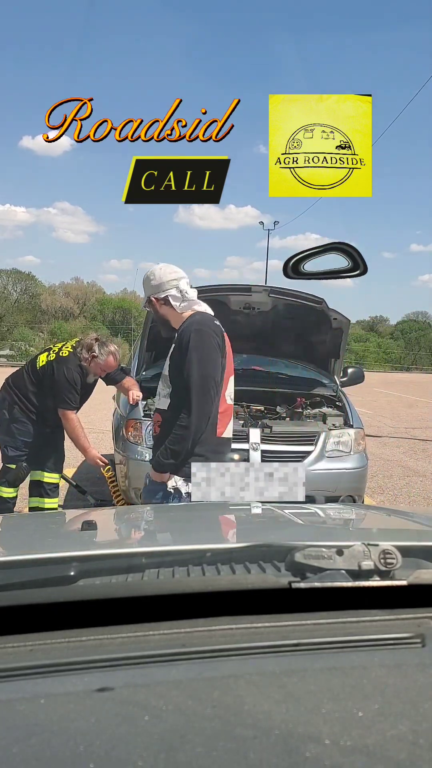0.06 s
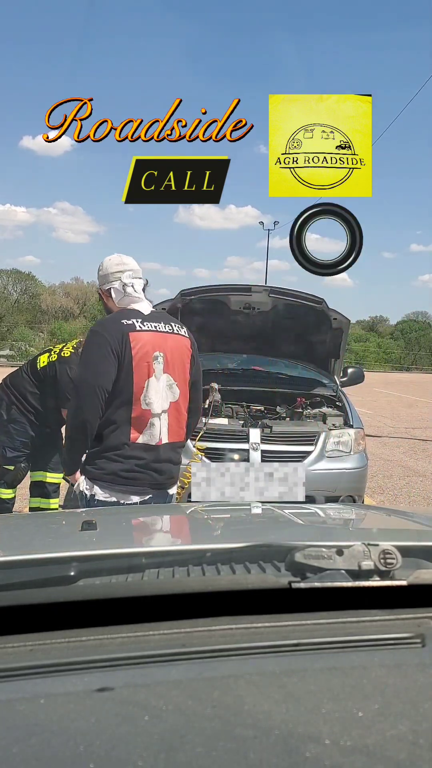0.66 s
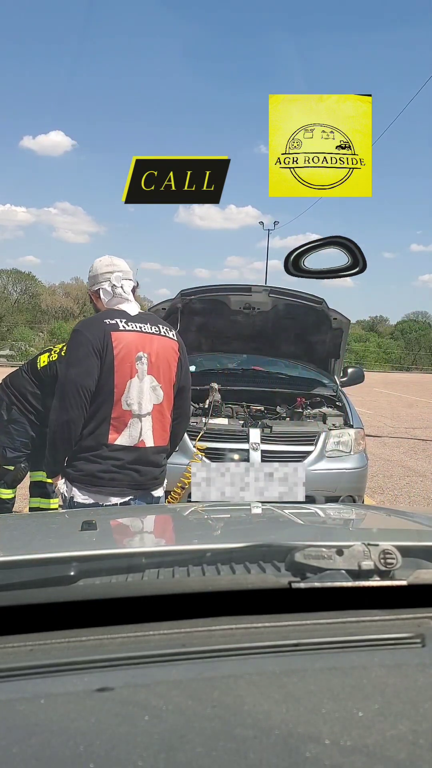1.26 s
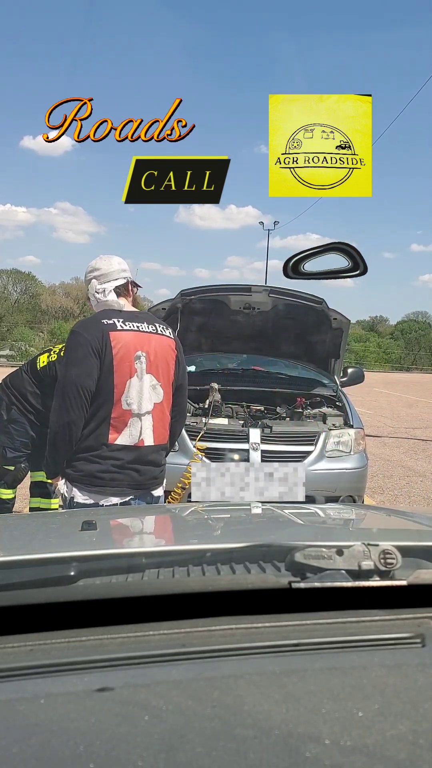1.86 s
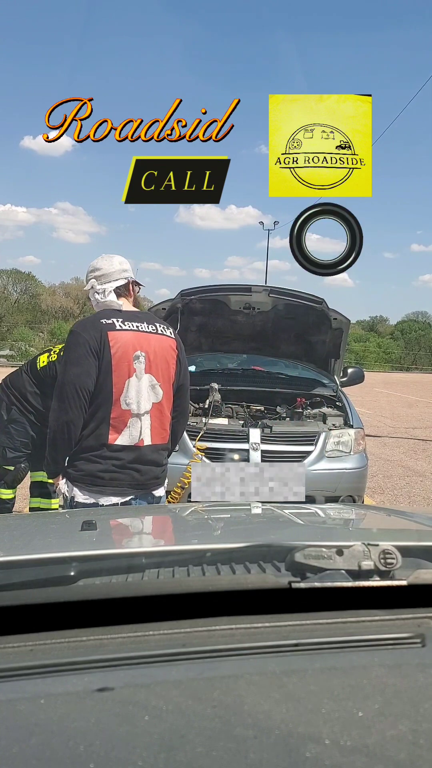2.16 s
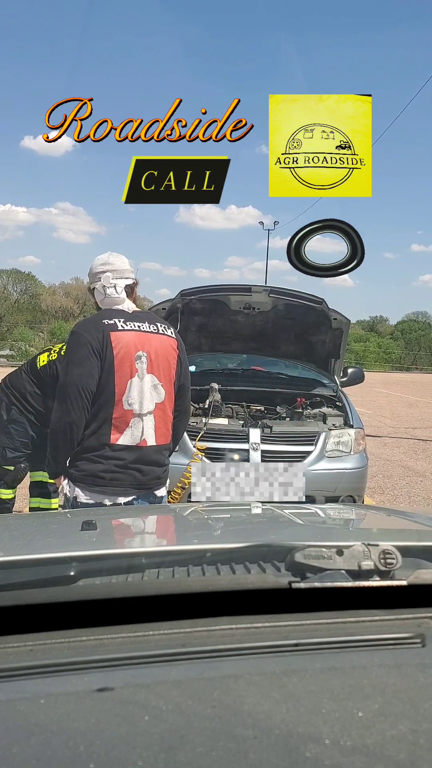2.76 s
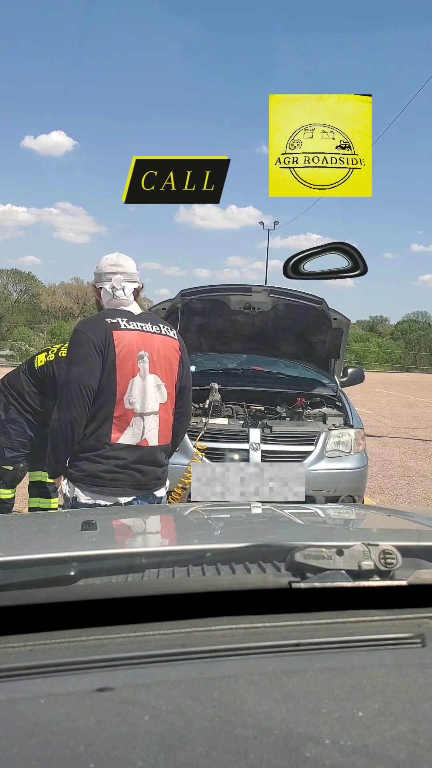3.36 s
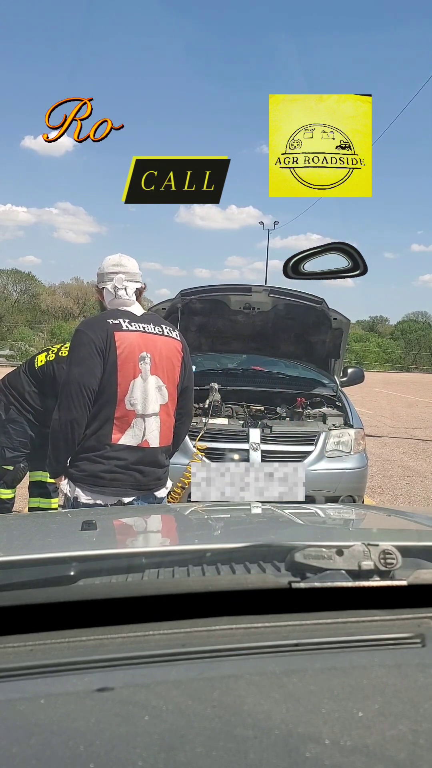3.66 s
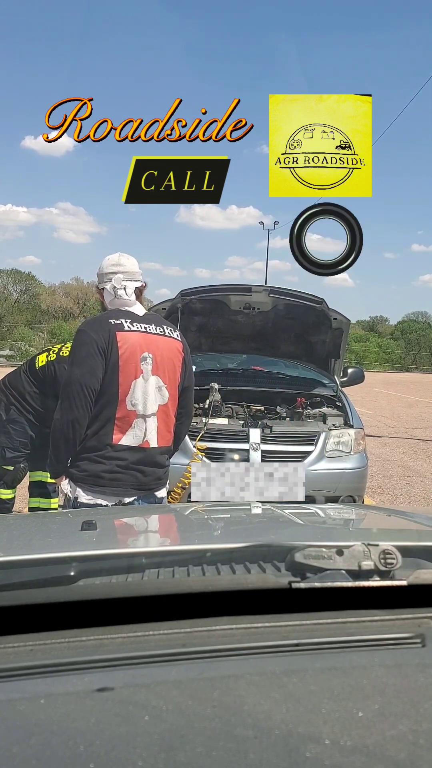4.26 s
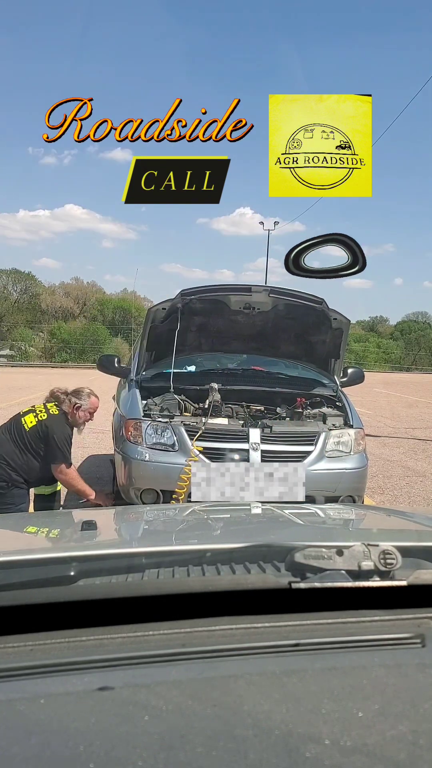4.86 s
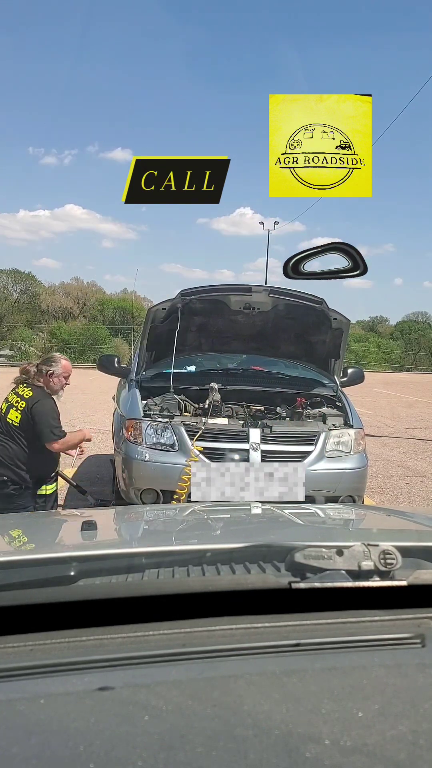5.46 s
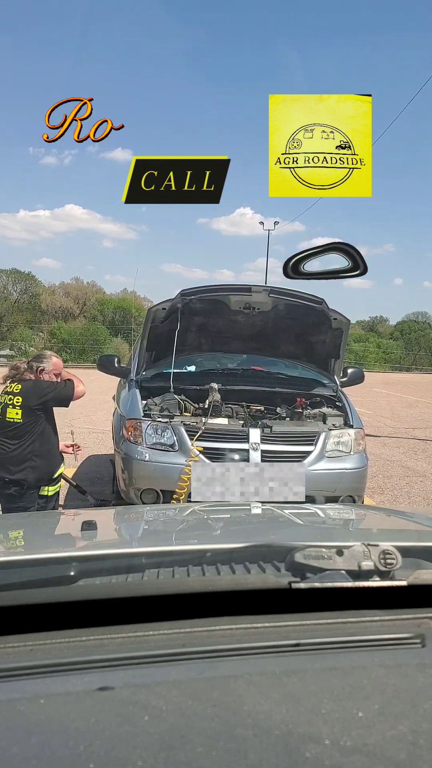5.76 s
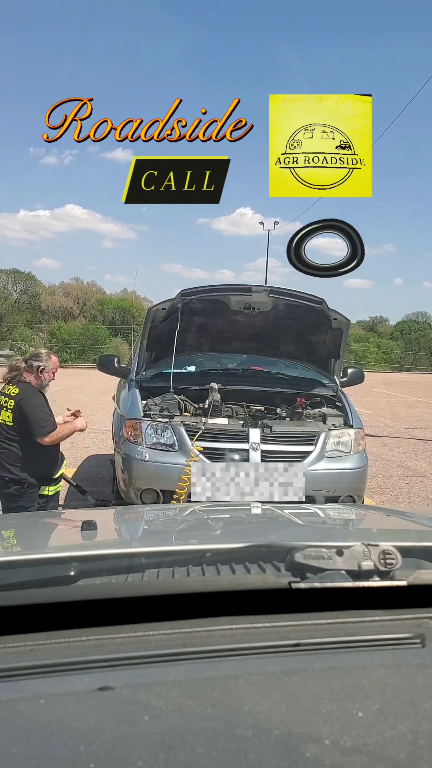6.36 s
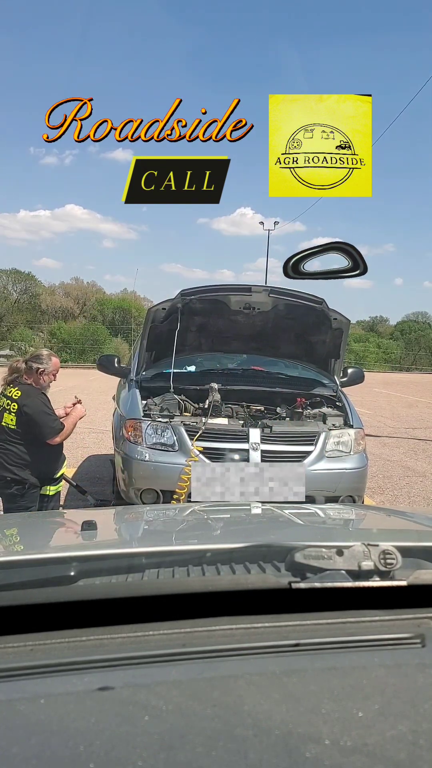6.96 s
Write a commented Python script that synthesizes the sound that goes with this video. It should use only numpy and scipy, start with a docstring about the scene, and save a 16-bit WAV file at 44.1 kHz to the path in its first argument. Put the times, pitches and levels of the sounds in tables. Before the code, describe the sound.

A big engine idles with a low, loping rumble, heard from inside the closed cab of a parked truck. Outside, an air compressor drones against it, making the bass heave slowly, with a thin fan whine, faint hose hiss and a few distant bird chirps. About two thirds through, the sound dips for an instant; then the compressor runs slightly slower and the air hiss is a little stronger.

```python
"""A loping V8 idle and a low boom, heard inside the cab of a service truck in a car park.
Uneven firings ring the cab's air modes. Outside, a piston compressor beats against the engine,
fan and belts whine, air hisses in a tyre hose and birds chirp faintly through the glass.
The sound drops out briefly at an edit cut; after it the compressor runs slower and the hose is louder."""
import sys
import numpy as np
from scipy import signal
from scipy.fft import rfft, irfft, next_fast_len
from scipy.io import wavfile
from scipy.ndimage import uniform_filter1d

SR = 44100
rng = np.random.default_rng(int(sys.argv[2]) if len(sys.argv) > 2 else 0)


def store_wav(level_fs):
    """Save 16-bit WAV to argv[1]."""
    pcm = np.round(np.clip(np.atleast_2d(level_fs), -1, 1) * 32767)
    wavfile.write(sys.argv[1], SR, pcm.T.astype(np.int16))


N = 317961
TIME = np.arange(N) / SR

CYCLE_HZ, CYLINDERS = 5.228, 8   # four-stroke idle
LIGHT_STROKE_HZ, LOADED_STROKE_HZ = 67.14, 63.85   # pump before and after the cut
BEAT_ORDER = 13   # engine order nearest the stroke rate
CUT_S = 4.741
AFTER_CUT = TIME > CUT_S


def from_db(db):
    """Decibels to gain."""
    return 10 ** (np.asarray(db) / 20)


def rms_one(x):
    """Scale to rms 1."""
    return x / np.sqrt(np.mean(x ** 2) + 1e-20)


def at_hz(points, hz):
    """Read a table on a log-frequency axis."""
    points = np.array(points)
    return np.interp(np.log(hz), np.log(points[:, 0]), points[:, 1])


def pan(db):
    """Stereo gains for a left-minus-right level."""
    return from_db(np.array([[db], [-db]]) / 2)


def drift(rate_hz):
    """Smooth random wander, rms 1."""
    hop, settle = 40, 2000
    r = np.exp(-2 * np.pi * hop * rate_hz / SR)
    slow = signal.lfilter([1], [1, -2 * r, r * r], rng.standard_normal(N // hop + settle + 2))[settle:]
    return np.interp(np.arange(N) / hop, np.arange(len(slow)), rms_one(slow))


def resonate(x, hz, width_hz):
    """Two equal resonators in series, for steep skirts."""
    r = np.exp(-np.pi * width_hz * np.sqrt(2) / SR)
    section = [(1 - r * r) / 2, 0, (r * r - 1) / 2, 1, -2 * r * np.cos(2 * np.pi * hz / SR), r * r]
    return signal.sosfilt([section, section], x)


def revolve(rate_hz, zero_s=.25):
    """Running phase in turns, zero at zero_s."""
    turns = np.cumsum(rate_hz) / SR
    return turns - turns[int(zero_s * SR)]


# cab left-right coherence: f/Hz, coherence/0-1
CAB_COHERENCE = [(70, .994), (130, .97), (290, .9), (640, .62), (1000, .25), (1400, .05), (15000, .05)]
# cab balance: f/Hz, left-right/dB
CAB_BALANCE = [(60, 0), (110, 1.3), (200, 3), (380, 2.5), (700, 8), (1290, -2), (2380, .5), (4400, 2.5),
               (9000, 2), (15000, 1.5)]

def cab_noise(spectrum):
    """Stereo noise of a given density: coherent bass, diffuse treble."""
    size = next_fast_len(N)
    hz = np.maximum(np.arange(size // 2 + 1) * SR / size, 1)
    mid, side = rfft(rng.standard_normal((2, size)))
    coherence = np.clip(at_hz(CAB_COHERENCE, hz), 0, 1)
    ears = np.array([[1], [-1]])
    stereo = mid + ears * side * np.sqrt((1 - coherence) / (1 + coherence))
    density_db = at_hz(spectrum, hz) + ears * at_hz(CAB_BALANCE, hz) / 2
    return irfft(stereo * from_db(density_db), size)[:, :N] * np.sqrt(SR / 2)


def cab_tone(turns, hz, random_phase=True):
    """One partial; cab reflections split the two sides in phase and level."""
    coherence = np.clip(at_hz(CAB_COHERENCE, hz), 0, 1)
    split_rad = np.arccos(coherence) * np.array([[.5], [-.5]]) * rng.choice([-1, 1])
    phase_rad = 2 * np.pi * (turns + random_phase * rng.random())
    return np.sqrt(2) * np.cos(phase_rad + split_rad) * pan(at_hz(CAB_BALANCE, hz))


# exhaust and mount vibration: cycle order, level/dB ahead of rumble()
EXHAUST_ORDERS = [(8, -37.2), (9, -54), (10, -53), (11, -39.5), (12, -46.5), (13, -39.5), (14, -45),
                  (15, -55), (16, -46), (18, -56), (21, -50), (24, -57), (29, -60), (37, -56), (41, -59)]
# cab air modes: f/Hz, width/Hz, level/dB ahead of rumble()
CAB_MODES = [(33, 7, -57), (46.3, 11, -53.5), (69.15, 15, -40.5), (145, 66, -52.5), (200, 39.6, -52.5)]

def engine(cycles, turbulence=.5):
    """Steady exhaust orders, plus cab modes rung by firings of uneven strength."""
    out = 0
    for order, db in EXHAUST_ORDERS:
        out += from_db(db) * cab_tone(order * cycles, order * CYCLE_HZ, random_phase=order != BEAT_ORDER)
    firing_count = np.floor(CYLINDERS * cycles)
    firings = np.diff(firing_count, prepend=firing_count[0]) > 0
    for hz, width_hz, db in CAB_MODES:
        push = rms_one(firings * rng.standard_normal(N)) + turbulence * rng.standard_normal(N)
        out += from_db(db) * rms_one(resonate(push, hz, width_hz)) * pan(at_hz(CAB_BALANCE, hz))
    return out


# pump partials ahead of rumble(): stroke order, light level/dB, loaded level/dB
PISTON_ORDERS = [(1, -40, -38.5), (2, -62, -57), (4, -63, -65), (6, -70, -78), (7, -70, -70), (8, -76, -76),
                 (9, -84, -75), (10, -85, -74), (11, -77, -79), (12, -86, -79), (13, -78, -82),
                 (15, -90, -78), (16, -88, -70), (17, -92, -75.5), (19, -94, -87), (20, -96, -88),
                 (22, -98, -87), (24, -88, -88), (25, -96, -88)]

def compressor(strokes, flutter_db=2.0):
    """Piston pump; the overtones flutter, and most grow under load."""
    out = 0
    for order, light_db, loaded_db in PISTON_ORDERS:
        overtone = order > 1
        db = np.where(AFTER_CUT, loaded_db, light_db) + overtone * flutter_db * drift(3)
        out += from_db(db) * cab_tone(order * strokes, order * LIGHT_STROKE_HZ, random_phase=overtone)
    return out


def rumble(machines, beat, load, light_db=-32.5, beat_db=1.5, full_load_db=-32, load_span_db=9.5):
    """Relevels the machines' bass: it heaves with the engine-pump beat, later grows with the load."""
    bass = signal.sosfiltfilt(signal.butter(2, 105, fs=SR, output="sos"), machines)
    window = int(.22 * SR)
    power = uniform_filter1d(uniform_filter1d(bass.mean(0) ** 2, window), window)
    db = np.where(AFTER_CUT, full_load_db - load_span_db * (1 - load), light_db + beat_db * beat)
    return bass * from_db(db) / np.sqrt(power) + (machines - bass)


# machine noise through the closed cab: f/Hz, density/(dB/Hz)
WASH_SPECTRUM = [(18, -79), (30, -69), (80, -64), (110, -72), (230, -77.5), (310, -80), (490, -83.5),
                 (660, -91), (1000, -97.5), (1350, -105), (1850, -111), (2500, -112), (3000, -117),
                 (4500, -121), (7500, -136)]

def wash(cycles, firing_db=-1.0, lope_db=.13, wander_db=.8):
    """Dull machine noise, throbbing with each firing and each engine cycle."""
    firing = np.cos(2 * np.pi * CYLINDERS * cycles)
    lope = np.cos(2 * np.pi * cycles)
    return cab_noise(WASH_SPECTRUM) * from_db(firing_db * firing + lope_db * lope + wander_db * drift(3.3))


# fan and belt tones: f/Hz, width/Hz, steady share/0-1, light level/dB, full-load level/dB, left-right/dB
FAN_TONES = [(448, 30, 0, -62, -62, 2), (563, 7, .75, -67, -85, 4), (566, 4, .94, -90, -59, 4),
             (740, 4, .85, -69.3, -85, 4), (750, 8, .5, -78, -70.5, 4), (872, 34, 0, -70, -70, 7),
             (1605, 30, 0, -83.3, -86, -2), (2672, 45, 0, -94.5, -87, 8), (3360, 40, 0, -96, -100, 4)]

def whines(load):
    """Fan blades and belts: each tone is part steady, part wavering with turbulence."""
    out = 0
    for hz, width_hz, steady, light_db, loaded_db, pan_db in FAN_TONES:
        waver = drift(width_hz * .61) + 1j * drift(width_hz * .52)
        phasor = np.sqrt(steady) + np.sqrt((1 - steady) / 2) * waver
        tone = np.abs(phasor) * cab_tone(hz * TIME + np.angle(phasor) / (2 * np.pi), hz)
        db = light_db + load * (loaded_db - light_db)
        out += from_db(db) * tone * pan(pan_db - at_hz(CAB_BALANCE, hz))
    return out


# hose air ahead of the flow gain: f/Hz, density/(dB/Hz)
HOSE_SPECTRUM = [(2500, -135), (4550, -126), (4800, -111), (5100, -113), (5600, -106.5), (5950, -119),
                 (6850, -121), (7300, -142)]
# air surges: centre t/s, length/s, gain/dB
HOSE_SURGES = [(1.65, 0.67, 1), (3.451, 0.7, 5)]

def hose(strokes, light_db=-15.5, loaded_db=-7.5, rise_db_per_s=.5, puff_db=2.0, flicker_db=2.0):
    """Air hiss on the left, puffing at each stroke; after the cut it rises with the pressure."""
    surge_db = sum(db * np.exp(-(2 * (TIME - t_s) / length_s) ** 4) for t_s, length_s, db in HOSE_SURGES)
    flow_db = np.where(AFTER_CUT, loaded_db + rise_db_per_s * (TIME - CUT_S), light_db + surge_db)
    puff = np.cos(np.pi * strokes) ** 4
    return cab_noise(HOSE_SPECTRUM) * from_db(flow_db + puff_db * puff + flicker_db * drift(12)) * pan(12)


def drone(start_hz=176.2, sag_hz_per_s=18, start_db=-45.5, fade_db_per_s=14):
    """A low tone that falls in pitch as it fades."""
    turns = np.cumsum(start_hz - sag_hz_per_s * TIME) / SR
    return from_db(start_db - fade_db_per_s * TIME) * cab_tone(turns, start_hz)


# noise floor: f/Hz, density/(dB/Hz)
HISS_SPECTRUM = [(2000, -124), (6800, -123), (7300, -132), (8500, -130), (11500, -123), (15500, -120)]

def hiss():
    """Faint, steady microphone hiss."""
    return cab_noise(HISS_SPECTRUM)


# chirps, spanned at half amplitude: centre t/s, span/s, start f/Hz, end f/Hz, level/dB, rasp/0-1
BIRD_CHIRPS = [(.085, .04, 3600, 4050, -79, .9), (.08, .06, 4800, 5200, -86, 1.0),
               (.316, .025, 4550, 4850, -79, .7), (.336, .03, 3400, 3750, -77, .8),
               (.78, .09, 6050, 5550, -82, 1.0), (.852, .05, 4650, 4300, -79, .7),
               (1.95, .08, 5100, 4800, -87, 1.0), (3.94, .09, 5950, 5450, -85, .9),
               (4.03, .08, 4900, 4500, -87, 1.0)]

def birds(rasp_hz=260):
    """Short gliding chirps, roughened by a fast pitch waver."""
    out, waver = np.zeros((2, N)), drift(270)
    for t_s, span_s, start_hz, end_hz, db, rasp in BIRD_CHIRPS:
        along = (TIME - t_s) / span_s
        on = np.abs(along) < 1
        hz = (start_hz + end_hz) / 2 + (end_hz - start_hz) * along[on] + rasp * rasp_hz * waver[on]
        envelope = np.cos(np.pi / 2 * along[on]) ** 2
        out[:, on] += from_db(db) * envelope * np.sin(2 * np.pi * np.cumsum(hz) / SR)
    return out * pan(5)


# scuffs: peak t/s, decay/s, level/dB
SOFT_SCUFFS = [(2.68, .05, -66), (2.8, 0.05, -77.5), (6.48, .05, -72)]
# scuff colour: f/Hz, relative density/dB
SCUFF_SPECTRUM = [(1200, -25), (2100, 4), (2600, -1), (3500, -12), (4500, -31)]

def scuffs(attack_s=.008):
    """Soft scuffs: noise bursts with a quick rise and a slower decay."""
    envelope = 0
    for t_s, decay_s, db in SOFT_SCUFFS:
        envelope += from_db(db) * np.exp(-np.maximum((TIME - t_s) / decay_s, (t_s - TIME) / attack_s))
    return envelope * rms_one(cab_noise(SCUFF_SPECTRUM))


def squeak(start_s=4.55, length_s=.1, ramp_s=.025, hz=3755, level_db=-75):
    """One thin squeak at a steady pitch."""
    envelope = np.clip(np.minimum(TIME - start_s, start_s + length_s - TIME) / ramp_s, 0, 1)
    return from_db(level_db) * envelope * cab_tone(hz * TIME, hz)


# engine bay noise: f/Hz, density/(dB/Hz)
BAY_SPECTRUM = [(400, -115), (800, -102), (1150, -99), (1400, -103), (1900, -117), (2500, -115),
                (4400, -124), (7000, -140)]

def engine_bay():
    """Midrange rush of the engine bay, heard after the cut."""
    return AFTER_CUT * cab_noise(BAY_SPECTRUM)


def scene(hunt_cycles=.006, stroke_jitter=.0007, load_shortfall=.13, load_build_s=.5):
    """A hunting idle and a pump, slower and loaded after the cut, drive the rumble, wash and hose."""
    load = AFTER_CUT * (1 - load_shortfall * np.exp(-np.abs(TIME - CUT_S) / load_build_s))
    cycles = revolve(np.full(N, CYCLE_HZ)) + hunt_cycles * drift(.7)
    stroke_hz = np.where(AFTER_CUT, LOADED_STROKE_HZ, LIGHT_STROKE_HZ)
    strokes = revolve(stroke_hz * (1 + stroke_jitter * drift(4)))
    beat = np.cos(2 * np.pi * (BEAT_ORDER * cycles - strokes))
    machines = engine(cycles) + compressor(strokes)
    cab = rumble(machines, beat, load) + wash(cycles)
    outside = engine_bay() + whines(load) + hose(strokes) + drone() + birds()
    return cab + outside + squeak() + scuffs() + hiss()


def record(dry, dip_depth=.85, dip_s=.005, fade_s=.008, cutoff_hz=15750):
    """Brief dropout at the edit cut, short end fade, steep low-pass."""
    dip = 1 - dip_depth * np.exp(-((TIME - CUT_S) / dip_s) ** 4)
    fade = np.minimum((TIME[-1] - TIME) / fade_s, 1)
    lowpass = signal.ellip(12, .1, 90, cutoff_hz, fs=SR, output="sos")
    return signal.sosfilt(lowpass, dry * dip * fade)


dry = scene()
out = record(dry)
store_wav(out)
```